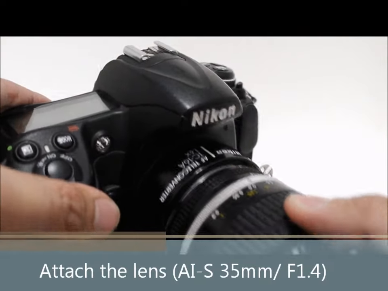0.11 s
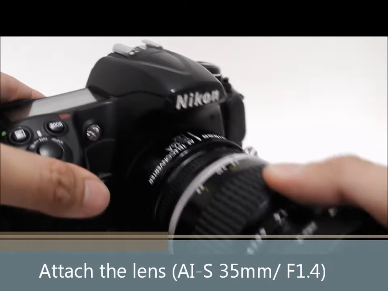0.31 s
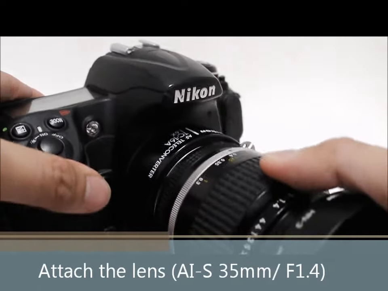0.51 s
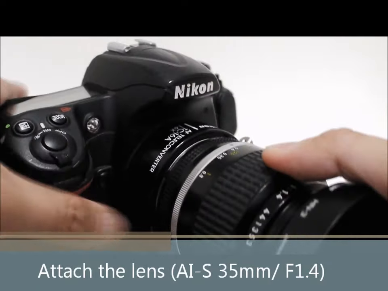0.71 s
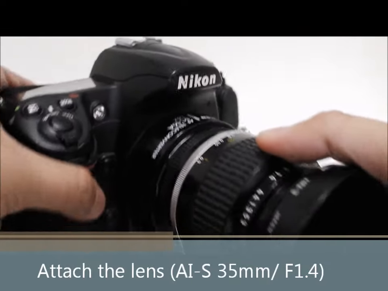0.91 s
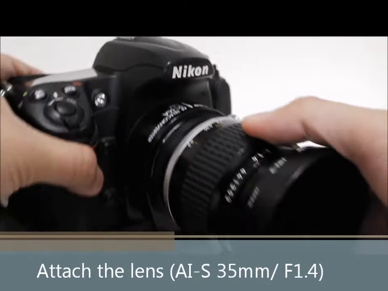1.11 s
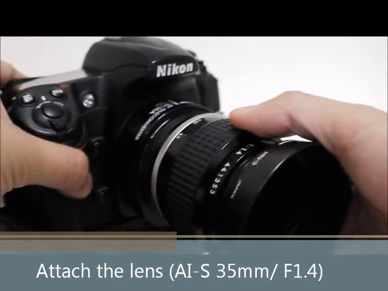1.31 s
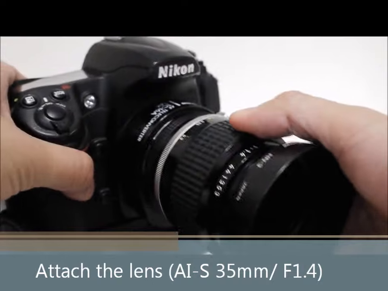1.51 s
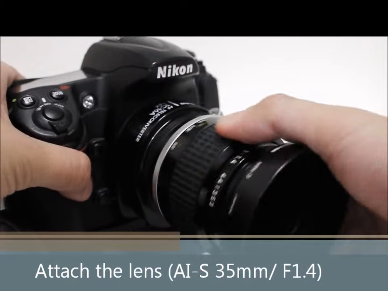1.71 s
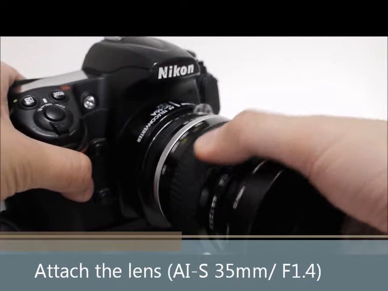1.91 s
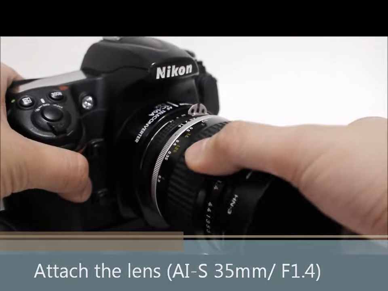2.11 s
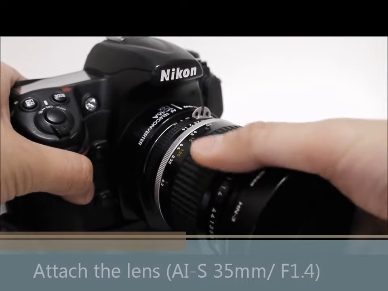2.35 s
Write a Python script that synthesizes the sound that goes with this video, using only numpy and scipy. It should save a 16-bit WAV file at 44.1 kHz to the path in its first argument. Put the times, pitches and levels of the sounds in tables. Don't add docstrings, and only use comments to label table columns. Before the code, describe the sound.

A metal camera lens being fitted by hand: a hard knock with a soft table thump, scattered tiny ticks, a gritty ring turn, then quieter clicks and a clack, close up in a small quiet room.

```python
import sys
import numpy as np
from scipy import signal
from scipy.fft import rfft, irfft
from scipy.io import wavfile
from scipy.ndimage import uniform_filter1d

SR = 44100
rng = np.random.default_rng(int(sys.argv[2]) if len(sys.argv) > 2 else 0)


def wrap_up_sound(samples):
    columns = np.atleast_2d(samples).T
    tamed = np.clip(columns, -1, 1)
    steps = np.round(tamed * 32767).astype(np.int16)
    wavfile.write(sys.argv[1], SR, steps)


def voltage_ratio(level):
    return 10 ** (np.asarray(level, float) / 20)


N = 110250
T = np.arange(N) / SR


def unit(x):
    return x / np.sqrt(np.mean(x ** 2) + 1e-30)


def colour(x, points):
    hz, db = np.array(points, float).T
    grid_hz = np.maximum(np.arange(1025) * SR / 2048, 10)
    gain_db = np.interp(np.log(grid_hz), np.log(hz), db)
    cepstrum = irfft(np.log(voltage_ratio(gain_db)))
    cepstrum[1:1024] *= 2
    cepstrum[1025:] = 0
    response = irfft(np.exp(rfft(cepstrum)))[:1024]
    return signal.fftconvolve(x, response)[:len(x)]


def ring(x, hz, t60):
    pole = np.exp(2j * np.pi * hz / SR - np.log(1000) / (t60 * SR))
    return signal.lfilter([1], [1, -pole], x).imag


def peak(x, hz, width):
    return signal.lfilter(*signal.iirpeak(hz, hz / width, fs=SR), x)


def walk(rate):
    k = int(SR / rate)
    steps = np.repeat(rng.standard_normal(N // k + 1), k)
    return unit(uniform_filter1d(uniform_filter1d(steps, k), k)[:N])


def chatter(ms, size=8192):
    after_db, after_times = -13, 10.6
    t = np.arange(size) / SR * 1000 / max(ms, .2)
    swell = t * np.exp(-t) * np.e
    rattle = voltage_ratio(after_db) * (1 - np.exp(-t)) * np.exp(-t / after_times)
    impacts = rng.standard_normal(size) * voltage_ratio(0.33 * rng.exponential(size=size))
    hit = rfft(impacts * (swell + rattle))
    even = irfft(hit / np.sqrt(uniform_filter1d(np.abs(hit) ** 2, size=40)))
    return even * (np.arange(size) < size - 1024)


def strikes(blows, size=8192):
    ms = np.arange(size) / SR * 1000
    push = np.zeros(size)
    for late, db, contact in blows:
        contact = max(contact, .03)
        push += voltage_ratio(db) / contact * np.sin(np.pi * np.clip((ms - late) / contact, 0, 1))
    return push


def add(out, x, s, db):
    i = int(s * SR)
    x = x[:N - i]
    out[i:i + len(x)] += x * voltage_ratio(db) / np.sqrt(uniform_filter1d(x ** 2, size=88).max())


# (time [s], level [dB], chatter [ms], rattle into the modes [dB])
KNOCKS = [
    (.218, -20.5, 1.14, -12),
    (1.1828, -36.5, 1.2, -10),
    (1.789, -38, 2.05, -11),
    (2.2045, -34.5, 1.95, -8.5),
    (2.26, -43, 0.9, -13),
]
# (delay [ms], level [dB], contact [ms])
BLOWS = [
    [(.2, -7, 0.054), (1.2, 5.5, 0.058), (3.4, -11, 0.3), (7.5, -13, 0.37)],
    [(.7, 0.5, .06), (1.9, 5, 0.11), (4.6, -7, 0.17), (8, -16, 0.25)],
    [(.3, 11, .05), (1.8, -8, .05), (4, -8, .1)],
    [(.4, -2, 0.054), (1.9, 6.5, 0.073), (3.5, -1.5, 0.086), (5.8, -3, 0.14), (13.5, -4, 0.24)],
    [(.4, -21, 0.056), (1.7, 8, 0.056), (3.2, -9, 0.054)],
]
# (frequency [Hz], level [dB], t60 [s])
TABLE_KNOCK = [(317, -13, 0.079), (418, -5, 0.12), (521, -7, 0.16), (777.5, 2, 0.072), (1068, -9, 0.038),
               (1194, -13, 0.057), (1450, 0, 0.026), (1655, 4.5, 0.018), (1998, -2, 0.038),
               (2580, -4, 0.018), (6574, -4.5, 0.024), (7170, -11.5, 0.06), (10750, -3.5, 0.0079),
               (11920, -6, 0.011)]
RING_STOP = [(689, 0.5, 0.072), (767, -8, 0.15), (1290, -2.5, 0.034), (1530, -2, 0.039), (1690, -7, 0.084),
             (1840, -3, 0.029), (2360, -12, 0.065), (4840, -9.5, .025), (6670, -7.5, 0.017),
             (9620, -12, 0.04)]
LATCH = [(970, -4.5, 0.046), (1890, -9, 0.035), (2600, -5, 0.023), (3060, -4.5, 0.031), (3400, 2, .03),
         (4960, -6, .03), (6290, 4.5, 0.02), (7500, -10, .025), (8700, -5, 0.015), (10200, -9, 0.017)]
CLACK = [(407, -3.5, 0.082), (511, -9, 0.11), (656, -5, 0.048), (764, -11, 0.062), (950, 0, 0.088),
         (1022, -5.5, .06), (1617, -2, 0.13), (1876, -3, .035), (2244, -7, 0.047), (3340, -6, 0.018),
         (3700, -11, 0.014), (4530, -12, 0.019), (7100, -23, .05)]
SPRING = [(1730, 3.5, 0.027), (3150, 0, .012), (3820, -4, 0.088), (5044, -23, .015), (8300, -11, .012)]
# (frequency [Hz], gain [dB])
CRACK_COLOURS = [
    [(100, -41), (320, -5.5), (1900, 2), (3200, -11), (10700, -11), (15500, -15)],
    [(100, -62), (400, -6), (1450, -7), (4100, -20), (9800, -21), (15500, -41)],
    [(100, -14), (350, 0), (900, -3), (3400, 0), (7000, -9), (15500, -11)],
    [(150, -26.5), (420, 3.5), (1000, 4.5), (1900, -7.5), (4600, -6.5), (15500, -30)],
    [(300, -26), (1500, 4), (4500, 0), (8500, -19), (15500, -21)],
]
CRACK_DB = [-1.5, -0.5, 2, -3.5, 0.5]


def knocks():
    out = np.zeros(N)
    parts = (TABLE_KNOCK, RING_STOP, LATCH, CLACK, SPRING)
    for knock, blows, modes, crack, crack_db in zip(KNOCKS, BLOWS, parts, CRACK_COLOURS, CRACK_DB):
        s, db, ms, rattle_db = knock
        hit = chatter(ms)
        push = unit(strikes(blows)) + voltage_ratio(rattle_db) * unit(hit)
        body = np.zeros(len(push))
        for k, (hz, mode_db, t60) in enumerate(modes):
            body += (-1) ** k * voltage_ratio(mode_db) * unit(ring(push, hz, t60))
        add(out, unit(body) + voltage_ratio(crack_db) * unit(colour(hit, crack)), s, db)
    return out + edge_slide()


def edge_slide():
    lead_in_s, lead_in_db = 0.0066, -12.5
    start, knock_db = KNOCKS[0][:2]
    since = T - start
    rise = (since < 0) * np.exp(np.minimum(since, 0) / lead_in_s * 2)
    tone = [(300, -4.5), (1000, -10.5), (4000, -13), (7000, -21), (12000, -21)]
    return voltage_ratio(knock_db + lead_in_db) * rise * unit(colour(rng.standard_normal(N), tone))


# (time [s], level [dB], body below 1.3 kHz [dB], metal above 5 kHz [dB], contact [ms])
TICKS = [(0.189, -59.5, 0, 6, 4.9), (0.4836, -50.5, -6, -3, 1.4), (0.5536, -54.5, 15, -26, 1.8),
         (.564, -54, -30, 6, 0.74), (.619, -51.5, -13, -1, 1.5), (0.6564, -47.5, 8, -24, 3),
         (0.715, -45, 3.5, -22, 3.84), (.733, -58, 10, -36, 3.5), (1.242, -55, 10, -22, 11),
         (1.327, -44.5, 7, -26, 2.1), (1.335, -49.5, 16.5, -35, 4.6), (1.457, -55.5, -22, -2, 1.4),
         (1.5749, -55, -38, 4.5, 1.5), (1.601, -55, 12, 5, 11), (2.334, -65, -14, -18, 1.3)]
# (frequency [Hz], level [dB], t60 [s])
TICK_RINGS = [(950, -19.5, 0.0062)]


def ticks():
    out = np.zeros(N)
    for s, db, low_db, high_db, ms in TICKS:
        hit = chatter(ms)
        tone = [(200, low_db - 32.0), (600, low_db), (1100, low_db), (1700, -0.5), (4400, -5.5),
                (6000, high_db - 7), (15000, high_db - 28)]
        sound = unit(colour(hit, tone))
        for hz, ring_db, t60 in TICK_RINGS:
            body_db = low_db if hz < 1300 else -max(low_db, 0)
            scatter_db = 2 * rng.standard_normal()
            sound = sound + voltage_ratio(ring_db + body_db + scatter_db) * unit(ring(hit, hz, t60))
        add(out, sound, s, db)
    return out


# (time [s], level [dB], frequency [Hz], t60 [s])
PINGS = [(0.4843, -56, 4750, .008), (0.4846, -67, 2300, .01), (0.484, -59, 950, 0.026),
         (.566, -57.5, 2400, .015), (0.6197, -48.5, 3400, 0.018), (0.619, -58, 9600, 0.0088),
         (.621, -57, 4930, 0.011), (0.621, -60.5, 1500, .015), (.6565, -57, 990, 0.044),
         (0.716, -62, 4500, .015), (0.72, -56, 3370, 0.017), (.8195, -63, 6640, .012),
         (0.819, -59, 8300, .01), (0.85, -69, 8300, .014), (.853, -66, 11500, .01),
         (.87, -62, 9600, 0.0092), (.913, -56, 5500, .012), (0.928, -53.5, 6900, .012),
         (2.229, -58, 6000, .008), (2.295, -66, 3730, .04), (2.335, -59, 3810, 0.027)]


def pings():
    out = np.zeros(N)
    for s, db, hz, t60 in PINGS:
        add(out, ring(chatter(0.34), hz, t60), s, db)
    return out


def grit(spiky_db, rough_db):
    grains = rng.standard_normal(N)
    grain_db = spiky_db * rng.exponential(size=N) + rough_db * walk(90)
    return unit(grains * voltage_ratio(grain_db))


def scrape(curve, peaks, tone, ring_db, spiky_db, rough_db):
    width_hz, bright_hz, bright_per_db = 260, 5000, 0.2
    times, levels = np.array(curve).T
    grains = grit(spiky_db, rough_db)
    turned = np.clip(T, times[0], times[-1]) - times.mean()
    rings = np.zeros(N)
    for hz, db, db_per_s in peaks:
        mode = unit(peak(grains, hz, width_hz * max(hz / 2500, 1)))
        rings += voltage_ratio(db + db_per_s * turned + 2 * walk(38.63)) * mode
    level_db = np.interp(T, times, levels, left=-120, right=-120)
    broad = unit(colour(grains, tone))
    high_pass = signal.butter(1, bright_hz, "high", fs=SR, output="sos")
    treble = signal.sosfiltfilt(high_pass, broad)
    broad = broad + (voltage_ratio(bright_per_db * (level_db - levels.max())) - 1) * treble
    return voltage_ratio(level_db) * (broad + voltage_ratio(ring_db) * rings)


# (time [s], level [dB])
TURN = [(.76, -72), (.82, -59), (.9, -57), (.915, -53), (.945, -47.5), (.99, -52.5), (1.05, -54.5),
        (1.12, -52.5), (1.17, -55), (1.2, -68)]
# (frequency [Hz], level [dB], drift [dB/s])
TURN_PEAKS = [(797, -1, 36), (2405, -5.5, 14), (3120, -5, -15), (5500, -13.5, -32)]
# (frequency [Hz], gain [dB])
TURN_COLOUR = [(120, -74), (200, -17), (491, -20), (749, 1.5), (1210, -6.5), (3190, -8.5), (7000, -18),
               (16000, -26)]


def ring_turn():
    return scrape(TURN, TURN_PEAKS, TURN_COLOUR, ring_db=-5.5, spiky_db=2.6, rough_db=1.05)


# (time [s], level [dB])
TWIST = [(1.66, -68.5), (1.78, -63.5), (1.81, -59), (1.885, -56.5), (1.93, -59.5), (1.945, -71),
         (1.96, -76)]
# (frequency [Hz], level [dB], drift [dB/s])
TWIST_PEAKS = [(2460, -4, 48), (4360, -3.5, -5), (6400, -7, -36)]
# (frequency [Hz], gain [dB])
TWIST_COLOUR = [(120, -32), (200, -12), (612, -5), (1020, -9), (2470, -2), (11300, -11.5), (16000, -15)]


def ring_twist():
    return scrape(TWIST, TWIST_PEAKS, TWIST_COLOUR, ring_db=-8.5, spiky_db=1.6, rough_db=0.83)


# (start [s], length [s], level [dB], top [Hz])
RUBS = [(0.604, 0.085, -63, 14000), (2.17, 0.19, -61, 5900), (0.98, 0.089, -59, 11000),
        (0.13, 0.1, -74, 15000), (2.47, 0.057, -68, 7700), (1.198, 0.1, -64, 10000),
        (1.4, 0.059, -60.5, 2200), (1, 0.077, -64, 1000), (1.7, 0.049, -68, 870), (1.2, 0.031, -58, 2700)]


def rubs():
    out = np.zeros(N)
    for s, length, db, top_hz in RUBS:
        arch = np.sin(np.pi * np.clip((T - s) / length, 0, 1))
        shape = np.sqrt(np.clip(arch, 0, 1))
        tone = [(200, -14), (700, 0), (1500, -2), (top_hz, -8), (top_hz * 2.3, -22)]
        out += voltage_ratio(db) * shape * unit(colour(grit(1.5, 2.3), tone))
    return out


# (time [s], level [dB], frequency [Hz], t60 [s])
THUMPS = [(.22, -48.5, 155.8, 0.21), (0.231, -56, 246.5, 0.33), (.17, -68, 199, .15),
          (1.189, -71.5, 148, .2), (1.242, -53.5, 326, 0.033), (1.328, -67, 234, 0.23),
          (1.441, -63.5, 250.6, 0.42), (1.475, -57.5, 280, 0.062), (1.609, -67, 198, 0.13),
          (1.728, -67, 222, 0.13), (1.791, -61.5, 259.6, 0.21), (2.213, -56, 258, 0.082),
          (2.271, -62, 253.7, 0.13)]


def thumps():
    rise_s, wobble_rad = 0.004, .045
    out, late = np.zeros(N), np.arange(SR // 2) / SR
    for s, db, hz, t60 in THUMPS:
        swell = (1 - np.exp(-late / rise_s)) * voltage_ratio(-60 * late / t60)
        drift = wobble_rad * np.cumsum(rng.standard_normal(len(late)))
        add(out, swell * np.sin(2 * np.pi * hz * late + drift), s, db)
    return out


def room(x):
    level_db, t60_s, top_t60_s, gap_s = -12.5, 0.16, 0.16, 0.0062
    t = np.arange(SR // 2) / SR
    noise = rng.standard_normal(len(t))
    low = signal.sosfilt(signal.butter(1, 2500, fs=SR, output="sos"), noise)
    decay = low * voltage_ratio(-60 * t / t60_s) + (noise - low) * voltage_ratio(-60 * t / top_t60_s)
    tail = decay * (1 - np.exp(-t / gap_s))
    return voltage_ratio(level_db) * signal.fftconvolve(x, tail / np.sqrt(np.sum(tail ** 2)))[:N]


# (frequency [Hz], gain [dB])
HISS = [(15, -59), (60, -35), (120, -28.5), (236, -10), (560, -6.5), (760, -7.5), (1290, -9.5),
        (12500, -28.5), (14800, -34), (16000, -27)]
# (frequency [Hz], width [Hz], level [dB])
HUM = [
    (738, 25, -73),
    (13600, 350, -82),
]


def hiss():
    level_db, sway_db, hum_sway_db = -61.5, .5, 1.5
    hum = np.zeros(N)
    for hz, width, db in HUM:
        sway = voltage_ratio(db + hum_sway_db * walk(37))
        hum += sway * unit(peak(rng.standard_normal(N), hz, width))
    return voltage_ratio(level_db + sway_db * walk(4.9)) * unit(colour(rng.standard_normal(N), HISS)) + hum


def scene():
    near = ticks() + knocks() + pings() + rubs()
    near = near + ring_turn() + ring_twist()
    near = near + room(near) + thumps()
    mic_low = signal.butter(6, 128, "high", fs=SR, output="sos")
    return (signal.sosfilt(mic_low, near) + hiss())[None]


def top_cut(x):
    return signal.sosfilt(signal.butter(12, 16690, fs=SR, output="sos"), x)


def record(dry):
    limit, top_hz, top_cut_db = .45, 15700, 41
    dry = limit * np.tanh(dry / limit)
    high_pass = signal.ellip(8, .1, 40, top_hz, "high", fs=SR, output="sos")
    top = signal.sosfiltfilt(high_pass, dry)
    return top_cut(dry - top * (1 - voltage_ratio(-top_cut_db)))


dry = scene()
out = record(dry)
wrap_up_sound(out)
```